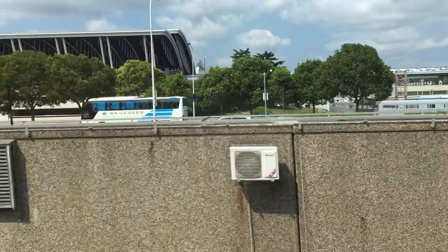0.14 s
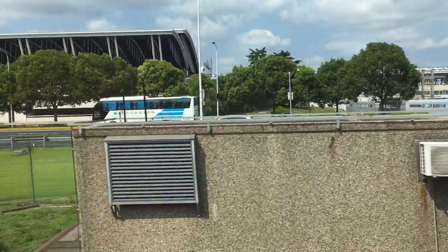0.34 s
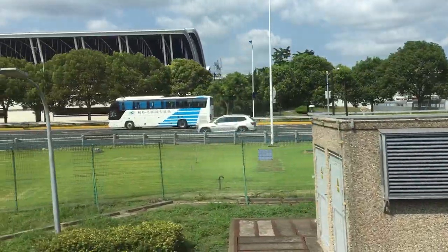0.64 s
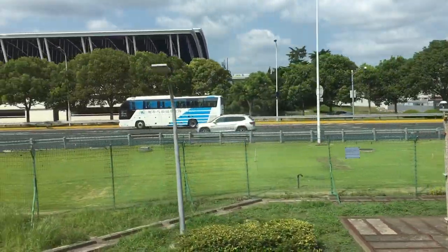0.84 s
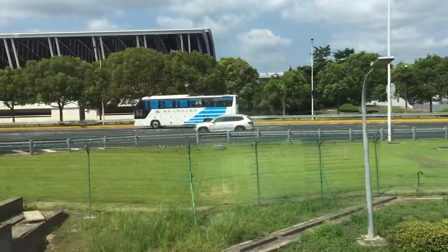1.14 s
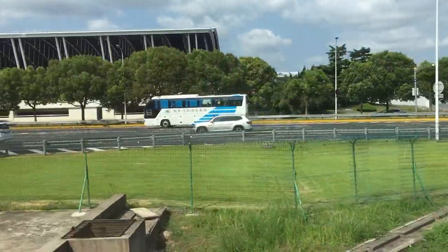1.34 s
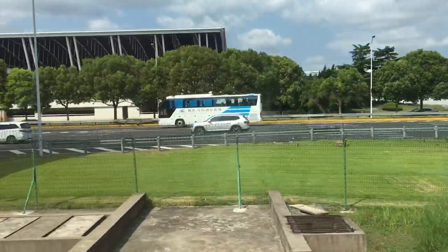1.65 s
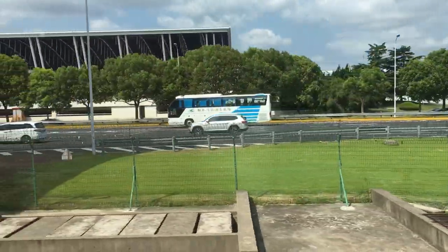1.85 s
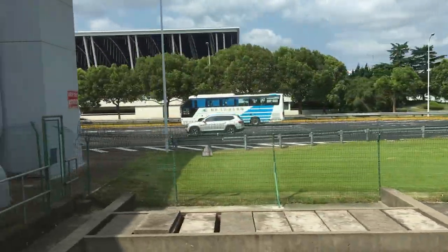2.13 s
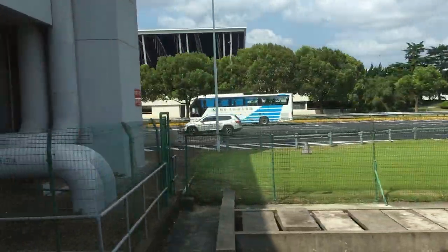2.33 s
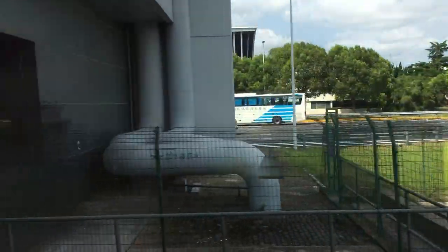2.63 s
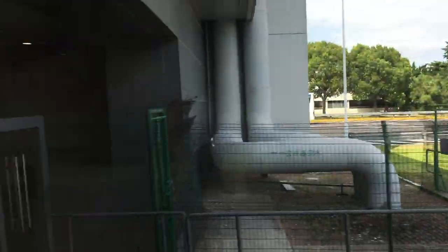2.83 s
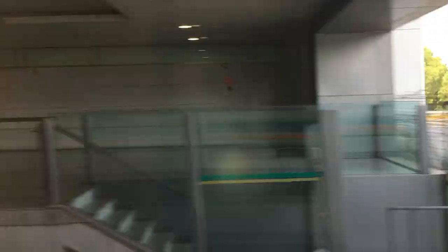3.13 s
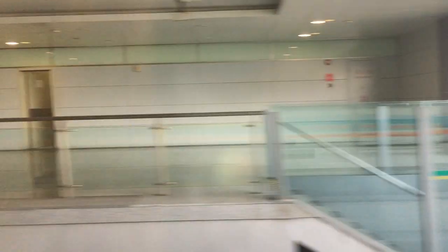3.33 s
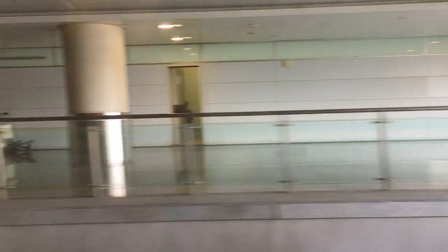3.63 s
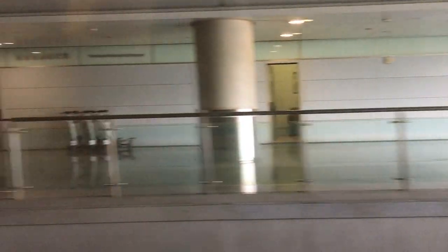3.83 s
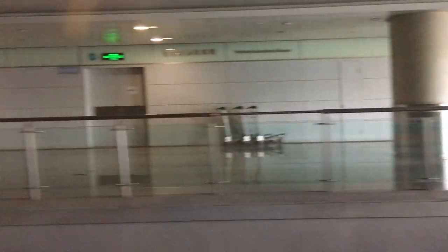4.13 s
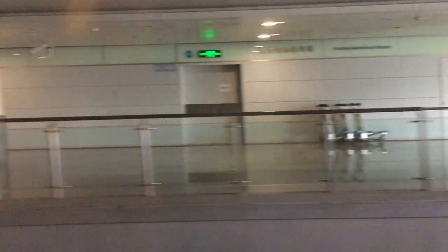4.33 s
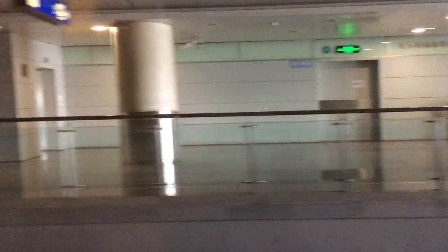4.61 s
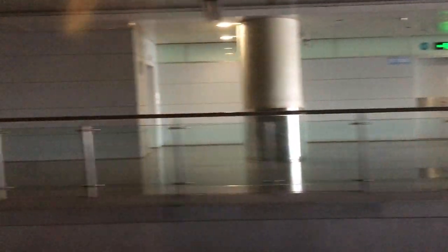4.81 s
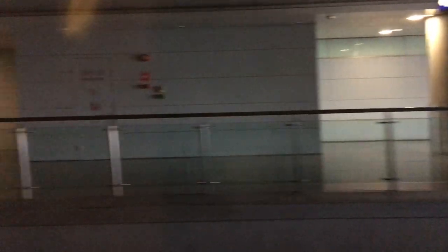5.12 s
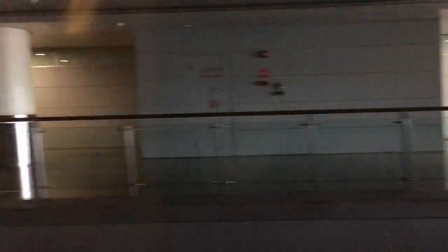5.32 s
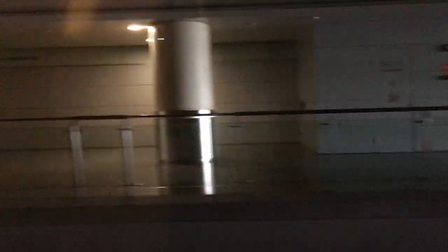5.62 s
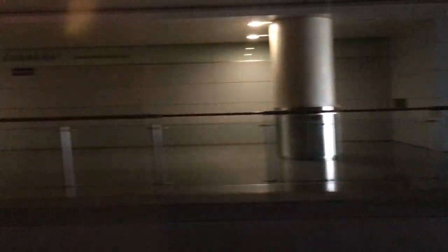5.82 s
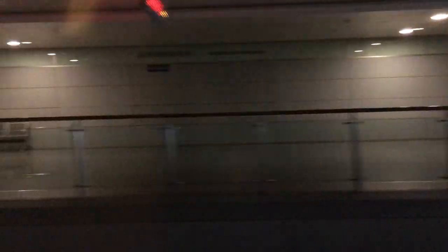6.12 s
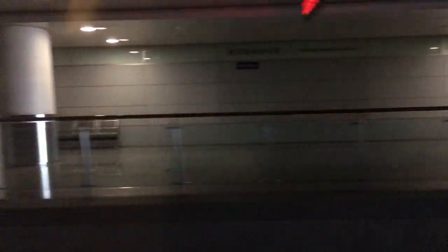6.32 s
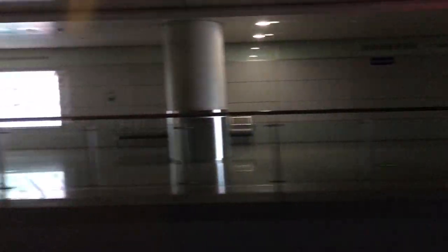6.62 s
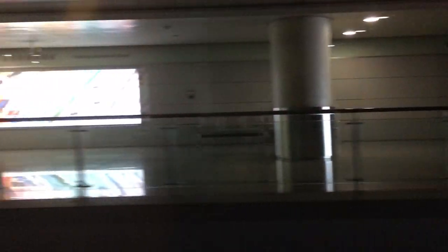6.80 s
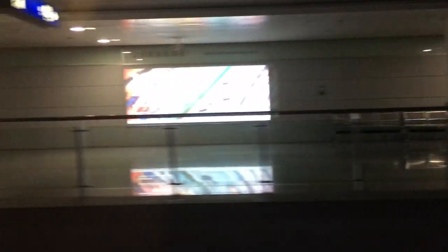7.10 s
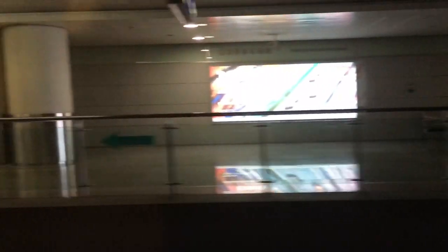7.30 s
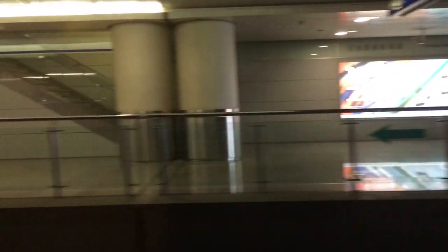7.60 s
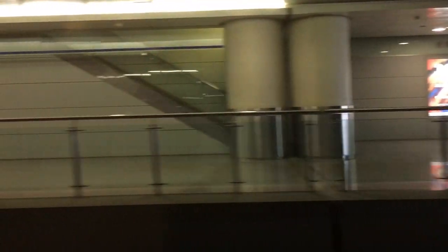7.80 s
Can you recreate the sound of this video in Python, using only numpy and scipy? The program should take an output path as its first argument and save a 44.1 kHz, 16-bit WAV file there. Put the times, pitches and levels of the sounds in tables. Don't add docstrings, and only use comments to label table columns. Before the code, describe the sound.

Heard from inside a train cabin, close to a seated passenger. From the start, a low humming tone near 180 hertz, with an octave and fainter overtones, slides very slowly downward over a booming car body and droning floor. A loose fitting gives tiny high squeaks about twelve times a second throughout, and ventilation hisses faintly. At about 2.4 seconds cloth rustles sharply with a snap and low chirp; around 2.6 air pushes and the body thumps as the train enters a building. From 3.5 the reflected roar swells and brightens, strongest around 5.4, while the hum wavers and pulses past pillars. Sleeve scuffs and strap chirps cluster from 3.6 to 4.5; heavier jolts come around 4.7 to 5.4. The hum surges near 6.2, the roar eases slightly, more rustling follows around 6.5, and hard dry snaps sound near 7.0, 7.6 and 7.9. It ends still moving.

```python
import sys
import numpy as np
from scipy import signal
from scipy.fft import rfft, irfft, next_fast_len
from scipy.io import wavfile
from scipy.ndimage import uniform_filter1d, map_coordinates

SR = 44100
rng = np.random.default_rng(int(sys.argv[2]) if len(sys.argv) > 2 else 0)


def file_out(sig):
    cols = np.atleast_2d(sig).T
    lim = np.clip(cols, -1, 1)
    pcm = np.round(lim * 32767).astype(np.int16)
    wavfile.write(sys.argv[1], SR, pcm)


def voltage_ratio(decibels):
    exponent = np.asarray(decibels, float) / 20
    return 10 ** exponent


N = 350594


def unit(x):
    return x / np.sqrt(np.mean(x ** 2) + 1e-20)


def curves(rows):
    s, *cols = np.transpose(rows)
    return [np.interp(np.arange(N) / SR, s, c) for c in cols]


def wobble(rate):
    knots = rng.standard_normal(int(N * rate / SR) + 4)
    return map_coordinates(knots, [np.arange(N) * rate / SR])


def passing(at_s, half_s):
    return np.exp(-.5 * ((np.arange(N) / SR - at_s) / half_s) ** 2)


def along(points, hz):
    f, db = np.transpose(points)
    return np.interp(np.log(hz + 1), np.log(f + 1), db, -120, -120)


def noise(spectrum, n=N, colour=lambda hz: 0):
    m = next_fast_len(n + 2048)
    hz = np.fft.rfftfreq(m, 1 / SR)
    shaped = rfft(rng.standard_normal(m)) * voltage_ratio(along(spectrum, hz) + colour(hz))
    return unit(irfft(shaped, m)[:n])


def steadied(x, share):
    envelope = np.abs(signal.hilbert(x, next_fast_len(N))[:N])
    size = uniform_filter1d(envelope, size=300)
    return unit(x / (size + 0.16) ** np.clip(share, 0, 1))


def whine():
    # time in seconds, tone in dB, octave in dB.
    line_levels = [(0, -31.5, -40.5), (.7, -35, -38), (1.5, -32, -43), (2.5, -28.5, -38.5),
                   (2.9, -29.5, -38), (3.25, -28, -46), (3.9, -27, -42), (4.12, -30.5, -37.5),
                   (4.9, -28.5, -39), (5.18, -24, -46), (5.31, -35, -46), (5.43, -28, -38.5),
                   (5.76, -33, -38), (5.95, -25, -39), (6.25, -21, -39), (6.75, -31, -41.5),
                   (7.45, -29.5, -43), (7.8, -24, -42.5)]
    # time in seconds, third harmonic in dB, fourth harmonic in dB.
    overtone_levels = [(0, -59, -65.5), (1.3, -63, -58), (2.6, -58.5, -58.5), (3.5, -51, -51.5),
                       (4, -52.5, -60), (4.5, -45, -45), (5.2, -49, -48), (6.4, -52, -53.5),
                       (7.95, -56, -59.5)]
    # time in seconds, nearness of the walls from 0 to 1.
    wall_nearness = [
        (0, 0.15),
        (3.5, 0.34),
        (4, 0.77),
        (5.3, 0.88),
        (6.2, 0.46),
        (6.8, 0.88),
        (7.95, 0.96),
    ]
    # time in seconds, tone change in dB, octave change in dB.
    pillars = [(.2, -1, -10), (.72, -6.5, 3.5), (1.66, -4, -1), (2.32, -2, 4), (3.15, -0.5, -4),
               (3.95, 4, -7), (4.42, 4, -3.5), (4.54, -3, 4), (4.97, 4, -2), (5.4, 1.5, 6),
               (5.63, -2.5, -9), (5.79, -1, 8.5), (6.07, 0, 2.5), (6.22, 1.5, -6.5), (6.95, -4.5, 2),
               (7.18, 5, 1.5), (7.3, -4, -6.5), (7.51, 3.5, 0.5), (7.62, -7, -1.5)]
    fade_db = [.5, 1, 2, 2]
    start_hz, brake_per_s = 181.3, .0389
    pillar_half_s = .045

    tooth_hz = start_hz * np.exp(-brake_per_s * np.arange(N) / SR)
    turn = 2 * np.pi * np.cumsum(tooth_hz) / SR
    walls = curves(wall_nearness)[0]
    out = np.zeros(N)
    tone_db, octave_db = curves(line_levels)
    for s, tone_change_db, octave_change_db in pillars:
        near = passing(s, pillar_half_s)
        tone_db = tone_db + tone_change_db * near
        octave_db = octave_db + octave_change_db * near
    for k, level_db in enumerate([tone_db, octave_db] + curves(overtone_levels), 1):
        drift = (.15 * k + 1.2 * walls) * wobble(5)
        blur = 0.67 * walls + 0.04 * (k - 1) ** 2.3
        echoes = blur * (wobble(14 + 8 * k) + 1j * wobble(14 + 8 * k))
        echoes = echoes + .5 * walls * wobble(2.966) * np.cos(.055 * turn + wobble(2))
        fade = voltage_ratio(fade_db[k - 1] * wobble(6))
        line = (1 + echoes) / np.sqrt(1 + blur ** 2) * fade
        out += voltage_ratio(level_db) * np.sqrt(2) * np.real(line * np.exp(1j * (k * turn + drift)))
    return out


def rumble():
    # time in seconds, swell in dB.
    jolts = [(.26, 2), (.85, 1.5), (1.15, -0.5), (1.9, 5), (2.2, 2.5), (2.69, 8.5), (3.28, 2), (3.39, -5.5),
             (3.48, 4), (3.74, -1.5), (4.23, 1), (4.49, -1), (4.65, 7), (4.73, -6), (4.89, 7), (5.11, 8.5),
             (5.4, 5.5), (6.16, 2), (6.26, -8), (6.35, 2)]
    # frequency in Hz, level in dB per Hz.
    boom_spectrum = [(20, -25.5), (31, -23), (38, -10.5), (44, -3), (60, -5.5), (72, -12.5), (90, -38.5)]
    # frequency in Hz, level in dB per Hz.
    drone_spectrum = [(55, -41), (66, -4), (76, 3), (92, 1), (104, 0), (114, -3), (124, -5), (145, -10.5),
                      (165, -12), (200, -30)]
    boom_db, drone_db = -32, -30.5
    floor_share, jolt_half_s = 0.46, 0.04

    jolt_db = sum(db * passing(s, jolt_half_s) for s, db in jolts)
    boom = voltage_ratio(boom_db + jolt_db) * steadied(noise(boom_spectrum), share=0.44)
    drone = voltage_ratio(drone_db + floor_share * jolt_db) * steadied(noise(drone_spectrum), share=0.14)
    return boom + drone


def squeaks():
    out, t = np.zeros(N + SR), np.arange(SR // 20) / SR

    def bump(at, width):
        return np.exp(-.5 * ((t - at) / width) ** 2)

    for s, low_db, top_db, pitch_chance, phase in rubs():
        turn = 2 * np.pi * 4338 * (1 + .002 * pitch_chance + 0.23 * (t - .01)) * t
        low_shape = bump(0.0084, 0.0047) - 0.47 * bump(.017, 0.0055)
        low = low_shape * voltage_ratio(low_db + 4.0) * np.sin(turn)
        top_shape = bump(0.0078, .004) + .6 * np.exp(1j * phase) * bump(.017, .004)
        top = top_shape * voltage_ratio(top_db + 4.0) * (np.exp(2j * turn) + .1 * np.exp(3j * turn))
        out[round(s * SR):][:len(t)] += low + np.imag(top)
    decay = voltage_ratio(-60 * np.arange(SR // 5) / SR / 0.38)
    ring = unit(decay * rng.standard_normal(SR // 5)) / np.sqrt(SR // 5)
    return (out + voltage_ratio(-11) * signal.fftconvolve(out, ring)[:len(out)])[:N]


def rubs():
    # time in seconds, rub number, squeak in dB, octave in dB.
    counts = [(.061, 0, -68, -83), (.289, 3, -68, -84), (.562, 6, -74, -88), (.783, 9, -64, -77),
              (1.167, 14, -66.5, -82), (1.67, 20, -68, -80), (2.283, 28, -68.5, -83), (3.401, 42, -67, -84),
              (3.993, 50, -67, -80), (4.377, 55, -72, -82), (4.723, 59, -70, -79), (4.875, 61, -63, -75),
              (5.369, 67, -65, -77), (5.705, 71, -68, -89), (6.334, 79, -71, -85), (6.757, 84, -62, -74),
              (7.4, 91.67, -68, -80), (7.931, 98, -65, -75)]
    s, number, low_db, top_db = np.transpose(counts)
    k = np.arange(int(number[-1]) + 1)
    chance = rng.standard_normal((len(k), 4))
    low_db = np.interp(k, number, low_db) + 0.89 * chance[:, 2]
    top_db = np.interp(k, number, top_db) + 1.2 * chance[:, 3]
    return zip(np.interp(k, number, s), low_db, top_db, chance[:, 0], chance[:, 1])


def rustles():
    # frequency in Hz, level in dB per Hz.
    cloth_spectrum = [(1800, -39.5), (3000, -8), (3500, -1.5), (6000, -3), (9100, -6.5), (10700, -13.5),
                      (12100, -14), (15500, -21.5)]
    # start in seconds, peak in dB, brightness in dB per octave.
    snaps = [
        (2.4135, -56, 5),
        (3.467, -62, 1),
        (5.2934, -57, 5),
        (6.108, -55.5, 4),
        (6.8319, -61, 7),
        (6.9227, -66, 4),
        (6.994, -48.5, 0),
        (7.399, -61.5, 4),
        (7.6201, -48, 1),
        (7.9434, -51, 3),
    ]
    out = np.zeros(N + SR)
    for s, rise, fall, db, hz, width in cloth():
        t = np.arange(int((rise + 3 * fall) * SR)) / SR
        swell = np.sin(np.pi / 2 * t / rise)
        shape = np.where(t < rise, swell, np.exp(-.5 * ((t - rise) / fall) ** 2))
        grain = voltage_ratio(18 * uniform_filter1d(rng.standard_normal(len(t)), size=60))
        blotch_db = 2 * rng.standard_normal(40)

        def colour(f):
            blotches = np.interp(f, np.arange(40) * 600, blotch_db)
            return blotches - 9 * (np.log2((f + 1) / hz) / width) ** 2

        out[round(s * SR):][:len(t)] += voltage_ratio(db) * shape * grain * noise(cloth_spectrum, len(t), colour)
    t = np.arange(SR // 40) / SR
    for s, db, tilt_db in snaps:
        def tilt(f):
            return tilt_db * np.log2((f + 1) / 6000)

        out[round(s * SR):][:len(t)] += voltage_ratio(db - 10.0 - 60 * t / .04) * noise(cloth_spectrum, len(t), tilt)
    return out[:N]


def cloth():
    # start in seconds, rise in seconds, fall in seconds, level in dB, colour in Hz.
    stroke_rows = [(1.36, .01, .015, -72, 7000), (2.38, .006, 0.018, -66.5, 4000),
                   (2.414, .008, 0.044, -53, 6200), (2.485, .03, .03, -56.5, 7500),
                   (2.54, 0.027, .034, -67.5, 7500), (3.86, .015, .025, -69.5, 10000),
                   (5.79, 0.0073, .012, -74, 8000), (6.29, .05, 0.023, -67.5, 8500),
                   (6.54, .03, 0.014, -60.5, 6500), (6.615, .03, .018, -65, 9500),
                   (7.71, .04, .03, -71, 9000), (7.85, .0075, .018, -65, 7000)]
    # start in seconds, rise in seconds, fall in seconds, level in dB.
    shift_rows = [(.27, .045, 0.056, -78), (1.15, .31, .35, -77), (3.3, 0.25, 0.11, -73.5),
                  (3.53, .1, .025, -71), (3.9, .08, .1, -74), (4.64, .05, .05, -75.5),
                  (4.78, .11, .07, -65), (5.52, .041, .3, -78.5), (6.22, .04, 0.036, -74.5),
                  (6.46, 0.018, .015, -81), (7.47, 0.051, .1, -73.5)]
    # start in seconds, rise in seconds, fall in seconds, level in dB, colour in Hz.
    scuff_rows = [
        (.56, .02, .022, -67, 5770),
        (3.68, .02, .05, -65.5, 6400),
        (3.685, .014, .02, -73, 9300),
        (3.76, .089, 0.056, -65.5, 4500),
        (3.97, .025, .02, -66.5, 5800),
        (4.04, .015, .012, -79, 12500),
        (4.22, 0.011, .015, -71, 6460),
        (4.31, .015, .02, -74, 9000),
        (4.47, .03, .02, -70, 7000),
        (6.503, 0.011, 0.014, -67, 8300),
    ]
    # start in seconds, rise and fall in seconds, level in dB, pitch in Hz.
    chirp_rows = [
        (.57, .02, -76, 5400),
        (2.2, 0.11, -75, 4420),
        (2.465, 0.014, -60.5, 2180),
        (3.71, .027, -65.5, 3630),
        (3.97, .02, -60.5, 4700),
        (4.8, .02, -71, 5300),
        (6.609, 0.02, -63.5, 5450),
        (6.992, .006, -67, 4600),
        (7.85, .025, -71, 5450),
        (7.87, .016, -62, 3670),
    ]
    strokes = []
    for row in stroke_rows:
        width = 1.1 + .13 * (row[3] + 70)
        strokes.append((*row, max(.4, width)))
    shifts = [(*row, 8500, 1.7) for row in shift_rows]
    scuffs = [(*row, .6) for row in scuff_rows]
    chirps = [(s, half, half, db, hz, 0.076) for s, half, db, hz in chirp_rows]
    return strokes + shifts + scuffs + chirps


def roar():
    # time in seconds, roar returned by the station in dB.
    wall_return = [(0, 0), (2.1, 0.5), (2.7, 1), (3.5, 6), (4, 8), (4.9, 9.5), (5.4, 10), (6.1, 8.5),
                   (6.6, 6), (7.8, 5), (7.95, 7.5)]
    # frequency in Hz, level in dB per Hz.
    low_spectrum = [(120, -28.5), (150, -4.5), (200, 3), (260, -4), (350, -3.5), (400, -16), (520, -22),
                    (700, -25), (800, -35), (1200, -46.5)]
    # frequency in Hz, level in dB per Hz.
    high_spectrum = [(220, -39.5), (380, -4), (437, -4.5), (503, -6.5), (594, -1.5), (728, -3.5),
                     (796, -11.5), (893, -7.5), (1310, -15), (1450, -16), (1750, -18.5), (2710, -24.5),
                     (5460, -38), (8000, -57.5), (10400, -86), (17600, -120)]
    # frequency in Hz, level in dB per Hz.
    hiss_spectrum = [(1760, -31), (3000, -13), (4060, -8.5), (4400, -2), (4890, -12), (5460, -4.5),
                     (7000, -8.5), (8970, -12.5), (10400, -16), (12000, -17), (15700, -24)]
    low_db, high_db = -38, -51
    low_grows = .2

    return_db, = curves(wall_return)
    push_db = 3 * passing(2.64, 0.21)
    low = voltage_ratio(push_db + low_db + low_grows * return_db + 1.5 * wobble(7)) * noise(low_spectrum)
    high = voltage_ratio(high_db + return_db + 0.38 * wobble(8.2)) * noise(high_spectrum)
    hiss = voltage_ratio(-76.5 + .4 * wobble(2.8)) * noise(hiss_spectrum)
    return low + high + hiss


def scene():
    return (whine() + rumble() + squeaks() + rustles() + roar())[None]


def roll_off(x):
    return signal.sosfilt(signal.butter(12, 15710, fs=SR, output="sos"), x)


def record(dry):
    # centre in Hz, width in Hz, change in dB.
    cabin_bands = [(1137, 58, 2.5), (1445, 27, 4.5), (1920, 70, 1), (2230, 90, -1.5), (2690, 130, 2.5),
                   (2960, 110, -1), (3980, 200, 1.5), (4970, 140, -3), (5200, 120, 1.5), (6800, 250, 0.5),
                   (7600, 330, -3), (10450, 250, -3), (12100, 400, 1)]
    m = next_fast_len(N + 8192)
    hz = np.fft.rfftfreq(m, 1 / SR)
    colour_db = sum(db * np.exp(-.5 * ((hz - centre) / width) ** 2) for centre, width, db in cabin_bands)
    colour_db = colour_db - 10 * np.log10(1 + (35 / (hz + 1)) ** 12)
    ends = np.sin(np.pi / 2 * np.clip((N - np.arange(N)) / 200, 0, 1))
    heard = irfft(rfft(dry * ends, m) * voltage_ratio(colour_db), m)[:, :N]
    heard = heard / (1 + np.abs(heard / .3) ** 5) ** (1 / 5)
    return roll_off(heard)


dry = scene()
out = record(dry)
file_out(out)
```